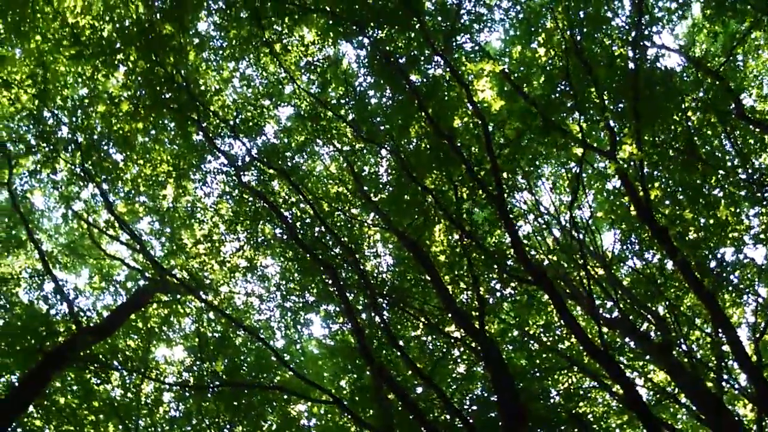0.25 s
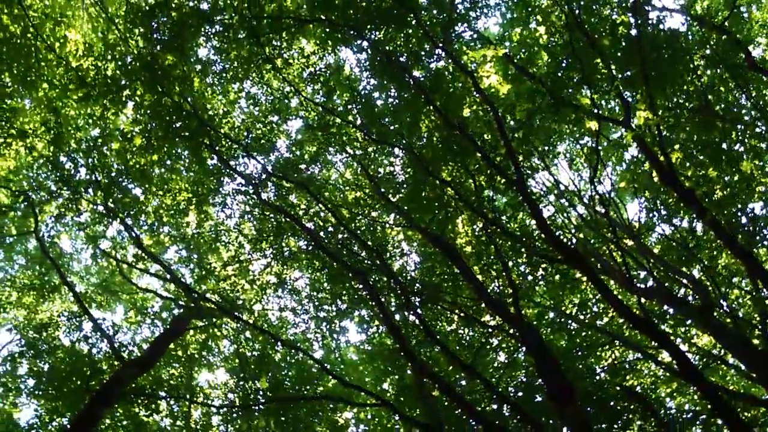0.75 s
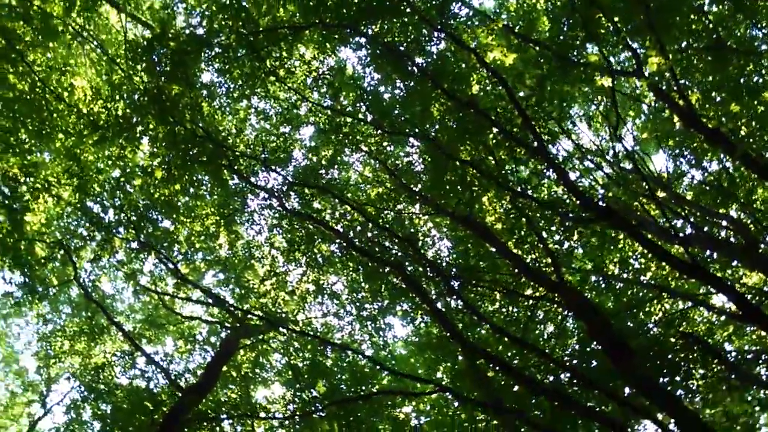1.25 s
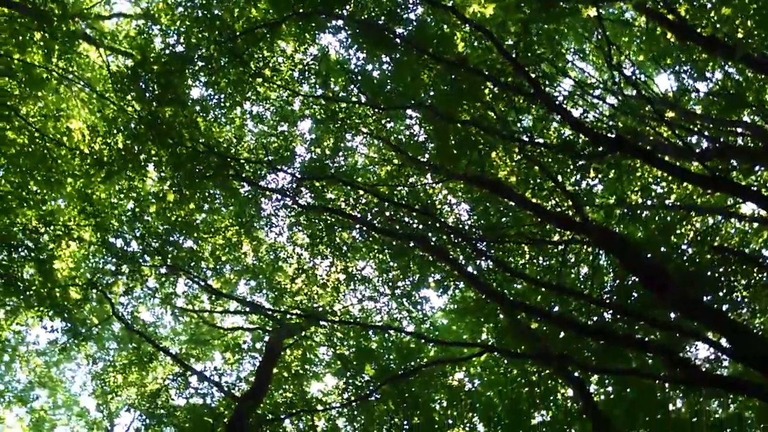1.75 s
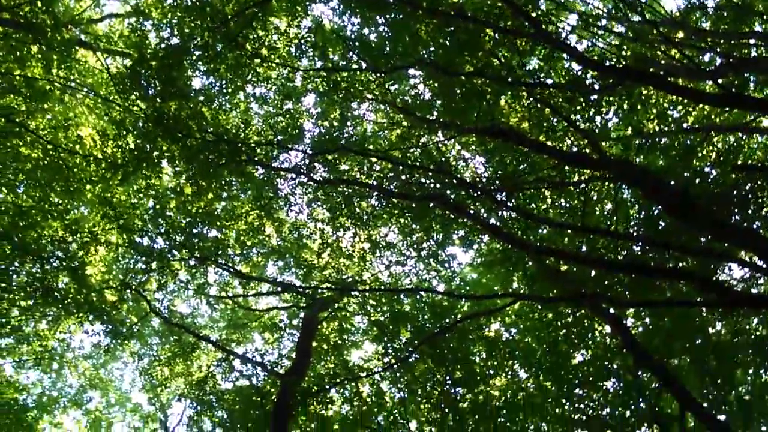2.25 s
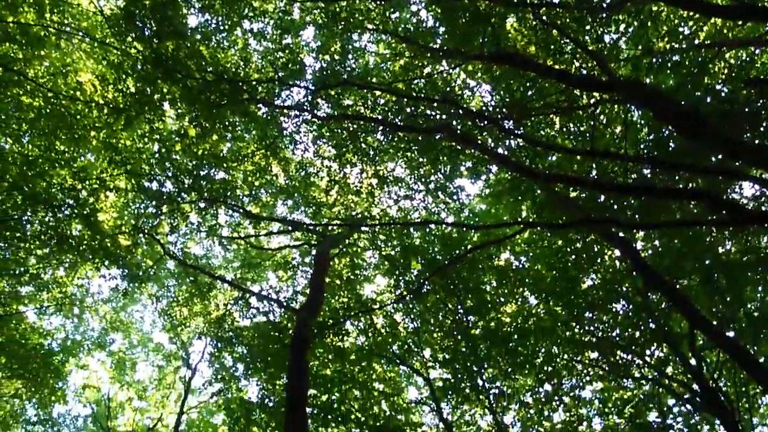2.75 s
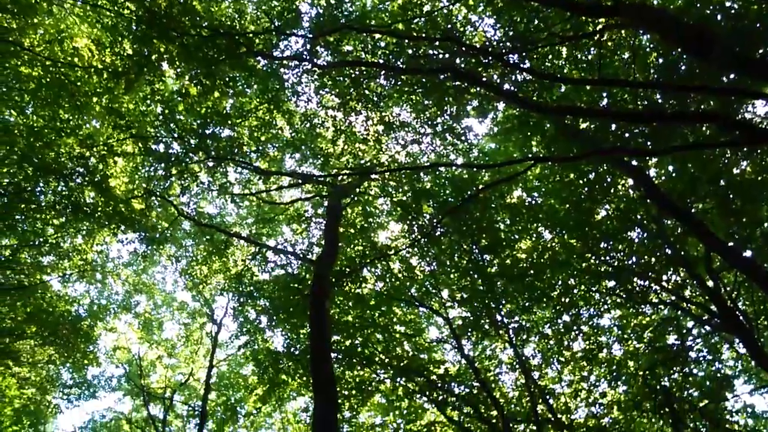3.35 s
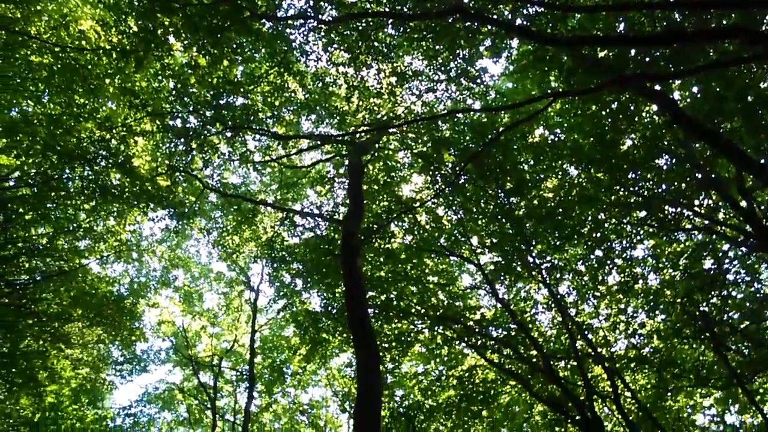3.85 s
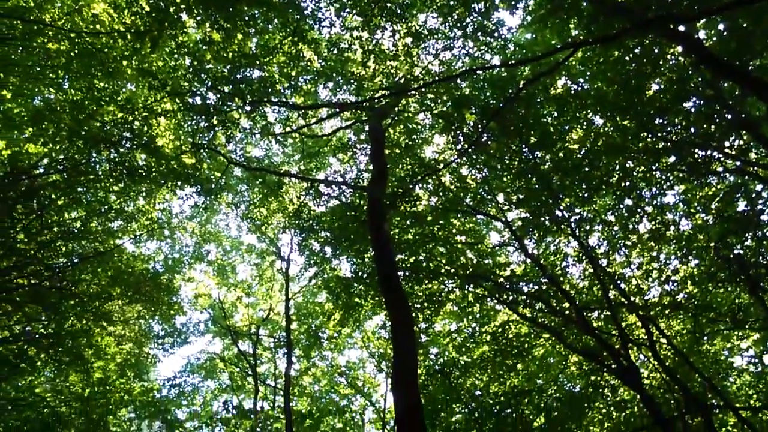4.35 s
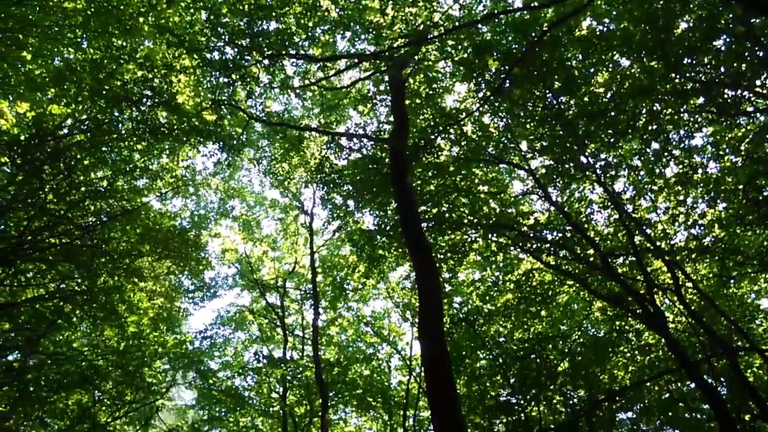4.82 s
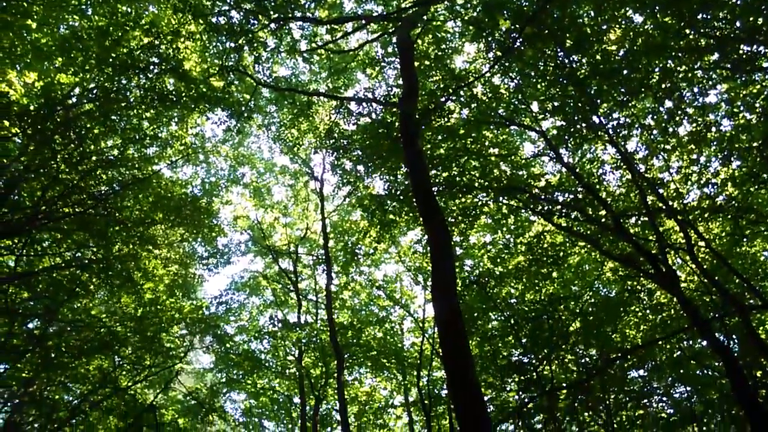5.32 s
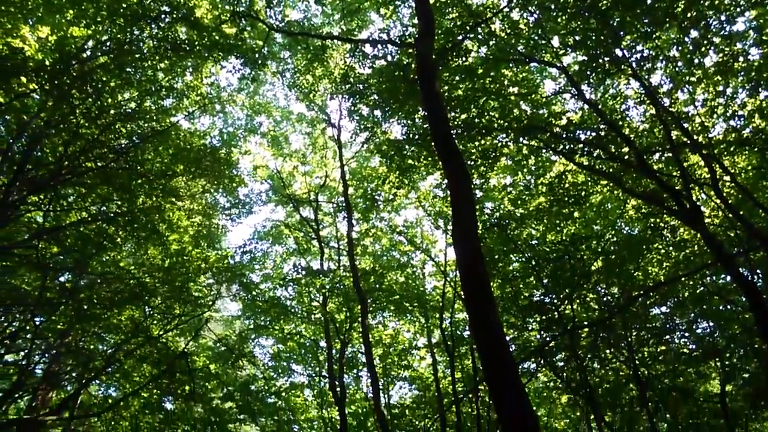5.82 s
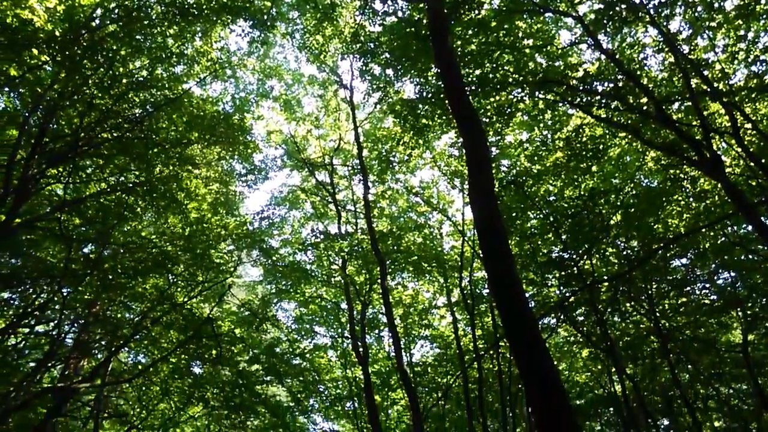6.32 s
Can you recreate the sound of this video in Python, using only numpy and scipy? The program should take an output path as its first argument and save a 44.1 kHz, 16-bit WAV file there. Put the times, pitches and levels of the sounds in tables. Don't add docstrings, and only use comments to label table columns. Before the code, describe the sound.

A thrush whistles bright, varied phrases and harsh chacks in a leafy wood, while wind buffets and thumps the microphone, strongest at the start.

```python
import sys
import numpy as np
from scipy import signal
from scipy.fft import rfft, irfft, next_fast_len
from scipy.io import wavfile
from scipy.ndimage import uniform_filter1d

SR = 44100
rng = np.random.default_rng(int(sys.argv[2]) if len(sys.argv) > 2 else 0)


def invert_db(x):
    u = np.asarray(x, float) / 20
    return 10 ** u


def int16_out(signal):
    q = np.round(np.clip(np.atleast_2d(signal).T, -1, 1) * 32767)
    wavfile.write(sys.argv[1], SR, q.astype(np.int16))


N = 290178


def at_hz(points, hz):
    table_hz, table_db = np.transpose(points)
    return np.interp(np.log(hz), np.log(table_hz), table_db)


def in_time(rows):
    s, *columns = np.transpose(rows)
    return [np.interp(np.arange(N) / SR, s, c) for c in columns]


def rms_one(x):
    return x / np.sqrt(np.mean(x ** 2) + 1e-20)


def filtered(x, order, hz, kind="low", zero_phase=False):
    run = signal.sosfiltfilt if zero_phase else signal.sosfilt
    return run(signal.butter(order, hz, kind, fs=SR, output="sos"), x)


def drift(rate_hz):
    r = np.exp(-2 * np.pi * rate_hz / SR)
    wander = signal.lfilter([1], [1, -2 * r, r * r], rng.standard_normal(N + SR))
    return rms_one(wander[SR:])


def coloured(points, channels):
    hz = np.maximum(np.arange(N // 2 + 1) * SR / N, 1)
    spectrum = rfft(rng.standard_normal((channels, N)))
    return rms_one(irfft(spectrum * invert_db(at_hz(points, hz)), N))


def panned(x, pan_db, lag=0):
    return np.stack([np.roll(x, lag) * invert_db(pan_db / 2), x * invert_db(-pan_db / 2)])


def glide(rows, start_db=0, end_db=0):
    return [[(s, a, db + start_db), (s + length, b, db + end_db)] for s, length, a, b, db in rows]


def scoop(rows):
    approach_s, onset_db, sag_db_per_s = 0.015, -6.5, 35
    notes = []
    for s, length, a, b, db in rows:
        t = np.linspace(0, length, num=24)
        left = np.exp(-t / approach_s)
        level_db = db + onset_db * left - sag_db_per_s * t
        notes.append(list(zip(s + t, b + (a - b) * left, level_db)))
    return notes


def whistle(note, overtones_db, waver, edge_s):
    # frequency in Hz, lift in dB.
    beak = [(4000, -0.5), (7000, -11.5), (9500, -10.5), (11500, 7.5), (15000, -7.5)]
    s, hz, level_db = np.transpose(sorted(note))
    start = max(round(s[0] * SR), 0)
    t = np.arange(start, min(round(s[-1] * SR), N)) / SR
    pitch = np.interp(t, s, hz)
    phase = 2 * np.pi * np.cumsum(pitch * (1 + waver[start:start + len(t)])) / SR
    tone = np.sin(phase)
    for k, db in enumerate(overtones_db, 2):
        audible = k * pitch < .45 * SR
        tone += invert_db(db + at_hz(beak, k * pitch)) * np.sin(k * phase) * audible
    to_edge = np.minimum(t - s[0], s[-1] - t)
    edges = np.sin(np.pi / 2 * np.clip(to_edge / edge_s, 0, 1)) ** 2
    out = np.zeros(N)
    out[start:start + len(t)] = np.sqrt(2) * tone * edges * invert_db(np.interp(t, s, level_db))
    return out


def wood(x, onset_s, early_db, top_early_db):
    top_hz, low_t60_s, top_t60_s = 8000, 0.7, 0.43
    early_t60_s = 0.076
    t = np.arange(SR) / SR
    noise = rng.standard_normal((2, SR)) * (1 - np.exp(-t / onset_s))
    low = filtered(noise, 2, top_hz)
    early = -60 * t / early_t60_s
    low_decay = invert_db(-60 * t / low_t60_s) + invert_db(early_db + early)
    top_decay = invert_db(-60 * t / top_t60_s) + invert_db(top_early_db + early)
    echoes = rms_one(low * low_decay + (noise - low) * top_decay) / np.sqrt(SR)
    size = next_fast_len(N + SR)
    return irfft(rfft(x, size) * rfft(echoes, size), size)[:, :N]


def air():
    # frequency in Hz, level in dB.
    spectrum = [(120, -15), (200, -10), (878, -15), (1090, -20.5), (4540, -25.5), (8920, -22), (13100, -25),
                (15700, -30)]
    # time in seconds, level in dB.
    hiss = [(0.0, -64), (0.4, -65.5), (1.1, -71.5), (1.87, -77), (1.97, -64), (2.7, -75.5), (2.82, -63.5),
            (3.4, -69.5), (3.57, -65.5), (3.7, -70.5), (3.75, -64), (4.15, -73), (4.38, -69), (4.42, -70),
            (5.03, -63), (5.07, -56.5), (5.9, -75.5), (6.58, -67)]
    noise, hiss_db = coloured(spectrum, channels=3), in_time(hiss)[0]
    top = filtered(noise, 2, 4500, "high", zero_phase=True)
    low = noise - top
    murmur_db = -53.5 + 0.013 * (hiss_db - np.mean(hiss_db))
    murmur = (0.79 * low[:2] + 0.42 * low[2]) * invert_db(murmur_db)
    flicker_db = .6 * drift(8)
    side_db = [[-3.5], [2.5]]
    return murmur + rms_one(top[:2]) * invert_db(hiss_db + 12.5 + flicker_db + side_db)


def gusting(gusts):
    rise_db_per_s, fall_db_per_s, lull_db = 1477.5, 519, (-45.5, -62.5)
    t, level = np.arange(N) / SR, np.outer(lull_db, np.ones(N))
    for s, length, *peak_db in gusts:
        loss = rise_db_per_s * np.maximum(s - t, 0) + fall_db_per_s * np.maximum(t - s - length, 0)
        level = np.maximum(level, np.array(peak_db)[:, None] - loss)
    return level


def wind():
    # frequency in Hz, density in dB per Hz.
    buffet = [(20, -44.5), (43, 10.5), (66, 7), (132, -7.5), (255, -26.5), (392, -40.5), (850, -35),
              (1540, -120)]
    # start in seconds, length in seconds, deep swell in dB, flutter in dB.
    left_gusts = [(.02, 0.11, -19.5, -36), (.22, 0.1, -32.5, -60), (.413, 0.42, -24.5, -45),
                  (.685, 0.017, -22, -26), (.732, 0.037, -14.5, -46), (.78, 0.092, -23.5, -45),
                  (.93, 0.17, -23.5, -61), (1.08, 0.074, -36.5, -60), (1.3, 0.18, -39, -52.5),
                  (1.5, 0.014, -25.5, -63), (1.83, 0.29, -40.5, -46), (2.22, 0.12, -30.5, -63),
                  (2.42, 0.08, -28.5, -43.5), (2.55, 0.33, -36.5, -41), (2.97, 0.061, -41, -42),
                  (3.12, 0.042, -35.5, -38.5), (3.21, 0.09, -33.5, -36.5), (3.43, 0.031, -35.5, -39.5),
                  (3.71, 0.036, -37, -38), (3.8, 0.17, -32, -30.5), (4.03, 0.076, -33.5, -32),
                  (4.19, 0.2, -34.5, -34), (4.56, 0.18, -36.5, -37.5), (4.81, 0.1, -37, -37),
                  (4.95, 0.2, -35, -55), (5.4, 0.19, -34.5, -41), (5.62, 0.16, -39, -40.5),
                  (6.15, 0.42, -37.5, -50)]
    right_gusts = [(0, 0.38, -32, -65), (.43, 0.23, -24, -50), (.73, 0.16, -32, -46), (.92, 0.19, -41, -47),
                   (2.32, 0.21, -35, -64), (2.6, 0.94, -55, -54), (3.7, 0.4, -60, -47),
                   (4.15, 0.25, -51, -47), (5.0, 0.28, -36, -54), (5.75, 0.11, -43, -64),
                   (6.2, 0.14, -42, -50.5)]
    deep_db, flutter_db = np.stack([gusting(left_gusts), gusting(right_gusts)], axis=1)
    eddies = coloured(buffet, channels=2)
    deep = filtered(eddies, 2, 140, zero_phase=True)
    lumps = np.clip([drift(69), drift(55)], -2, 2)
    swell = 3.35 * np.tanh(rms_one(deep * invert_db(2.02 * lumps)) / 2.32) * invert_db(deep_db)
    shedding_per_s = 56 * (1 + .1 * lumps[::-1])
    shed = np.cumsum(shedding_per_s, axis=1) / SR
    throb_db = 7 * np.sin(2 * np.pi * shed + .6)
    pushes = filtered(np.diff(np.floor(shed), prepend=0), 2, [90, 260], "band")
    bright = filtered(rms_one(eddies - deep) + invert_db(3) * rms_one(pushes), 1, 160, "high")
    edged = filtered(bright, 6, 285) + invert_db(-15.5) * bright
    flutter = rms_one(edged * invert_db(2.5 * lumps)) * invert_db(flutter_db + throb_db - 4.5)
    return filtered(swell + flutter, 3, 46, "high")


def slaps():
    # start in seconds, peak in dB, ring in Hz.
    eddy_slaps = [
        (0.028, -10, 111),
        (.1, -12, 102),
        (.413, -14.5, 110),
        (0.431, -12, 88),
        (0.564, -32, 92),
        (.604, -12, 93),
        (.692, -16.5, 218),
        (0.741, -6.5, 115),
        (.826, -22, 138),
        (1.378, -26.5, 151),
    ]
    cycles, pan_db = 3.3, 35
    out, t = np.zeros((2, N)), np.arange(6000) / SR
    for s, peak_db, hz in eddy_slaps:
        decay_db = -60 * t * hz / (2 * cycles)
        swing = -np.sin(2 * np.pi * hz * t) * invert_db(peak_db + 3.0 + decay_db)
        at = round(s * SR)
        out[:, at:at + 6000] += swing * invert_db([[0], [-pan_db]])
    return filtered(out, 4, [40, 380], "band")


def ticks():
    # start in seconds, peak in dB, ring in Hz.
    creaks = [(0.377, -38.5, 640), (0.412, -36, 676), (0.433, -39, 710), (0.464, -34, 910),
              (0.469, -30.5, 700), (0.485, -43, 1130), (0.737, -39.5, 680), (1.611, -40.5, 450),
              (3.351, -43.5, 1550), (3.659, -23, 1207), (3.698, -34.5, 1260), (4.01, -39.5, 823),
              (4.028, -43.5, 780), (5.468, -52, 400)]
    out, t = np.zeros((2, N)), np.arange(1500) / SR
    for s, peak_db, hz in creaks:
        ring = np.sin(2 * np.pi * hz * t) * invert_db(-60 * t / 0.021)
        shell = .5 * np.sin(2 * np.pi * 570 * t) * invert_db(-60 * t / 0.037)
        snap = invert_db(1.5 - 60 * t / 0.013) * rng.standard_normal(1500)
        at = round(s * SR)
        out[:, at:at + 1500] += panned(invert_db(peak_db) * (ring + shell + snap), pan_db=8.0)
    return filtered(out, 4, 1750)


def grip_hum(grip):
    return invert_db(-12) * wood(grip[0], onset_s=0.0074, early_db=10.5, top_early_db=1.5)


def far_coo():
    # time in seconds, pitch in Hz, level in dB.
    arch = [
        (3.81, 1250, -67),
        (3.95, 1444, -63),
        (4.05, 1540, -72),
    ]
    return whistle(arch, (), 0.03 * drift(60), edge_s=0.04) * invert_db(5 * drift(12))


def far_caller():
    # time in seconds, pitch in Hz, level in dB.
    nasal = [
        [(6.32, 1550, -57), (6.326, 1700, -48), (6.332, 2330, -47), (6.344, 2390, -45), (6.349, 1800, -44),
         (6.356, 1200, -56)],
    ]
    call = sum(whistle(note, (9, -1), .015 * drift(200), edge_s=.002) for note in nasal)
    effort = np.sqrt(uniform_filter1d(call ** 2, size=300) + 1e-12)
    rasp = filtered(rng.standard_normal(N), 6, [1800, 4900], "band")
    call = call + invert_db(-7) * effort * rms_one(rasp)
    haze = wood(call, onset_s=0.015, early_db=2, top_early_db=2)
    return invert_db(-3) * panned(call, 3.0) + invert_db(1.5) * haze


def small_birds():
    # start in seconds, length in seconds, from Hz, to Hz, level in dB.
    lisp_notes = [(.2, 0.081, 8200, 8340, -52), (.255, 0.061, 9200, 9000, -48),
                  (.262, 0.052, 7230, 7870, -48.5), (.35, 0.081, 9250, 8730, -50.5),
                  (.36, 0.036, 7000, 7890, -44), (.4, .09, 7550, 7600, -66), (1.9, 0.083, 9230, 9800, -49),
                  (1.93, 0.12, 8530, 7940, -56), (1.972, 0.0077, 8000, 6860, -38),
                  (1.98, 0.0048, 6830, 7120, -36), (2.02, 0.017, 8160, 8550, -56),
                  (2.06, 0.051, 8760, 8430, -56), (2.08, 0.1, 7300, 7370, -58),
                  (3.1, 0.043, 6400, 7430, -53.5), (3.13, 0.044, 7700, 6500, -58),
                  (3.2, 0.043, 8500, 8400, -55.5), (3.235, 0.091, 7750, 7800, -56.5),
                  (3.21, 0.08, 6700, 6900, -50), (4.97, 0.088, 6890, 8260, -51.5),
                  (5.405, 0.065, 7650, 7520, -46.5), (5.51, 0.055, 7100, 7700, -45),
                  (5.55, 0.09, 8700, 8000, -53.5), (6.47, 0.047, 8000, 8120, -56),
                  (6.5, 0.034, 7500, 7630, -56.5)]
    tsip_notes = [
        (4.768, 0.0097, 8650, 7900, -39),
        (4.77, 0.012, 7500, 6360, -40.5),
        (4.828, 0.053, 8900, 7300, -48),
        (4.828, 0.016, 7650, 6330, -37.5),
        (4.878, 0.014, 8700, 7400, -35.5),
        (4.88, 0.012, 7530, 6460, -37.5),
        (5.62, 0.036, 6640, 7380, -46),
        (6.0, 0.027, 6940, 6270, -54),
        (6.2, 0.011, 3570, 3860, -57.5),
    ]
    waver = .02 * drift(250)
    lisps = sum(whistle(note, (), waver, edge_s=.004) for note in glide(lisp_notes))
    tsips = sum(whistle(note, (), 0 * waver, edge_s=.004) for note in glide(tsip_notes))
    return panned(lisps, -16.5) + panned(tsips, 1.5)


def chacks():
    # start in seconds, length in seconds, centre in Hz, width in Hz, level in dB.
    rasps = [
        (0, 0.083, 2620, 494, -54),
        (0, 0.0044, 4620, 1360, -18.5),
        (0, 0.091, 6240, 1600, -48),
        (0.2, 0.042, 4180, 1510, -33),
        (0.794, 0.015, 5080, 2185, -32),
        (0.1, 0.028, 4740, 700, -24),
        (0.159, 0.09, 3040, 1200, -49),
        (0.307, 0.15, 2020, 1410, -61.5),
    ]
    harsh = [
        (0.437, 0.033, 4920, 1570, -32),
        (0.727, 0.06, 5200, 2020, -39.5),
        (1.135, 0.12, 5600, 1560, -57.5),
        (2.215, 0.053, 5280, 2310, -31.5),
        (2.762, 0.053, 7250, 910, -44),
        (2.796, 0.029, 7200, 2400, -30.5),
        (3.511, 0.03, 5460, 1290, -39),
        (4.392, 0.025, 5140, 1120, -27),
        (5.062, 0.03, 5100, 2240, -35.5),
    ]
    t = np.arange(4000) / SR
    out = np.zeros(N)
    for bursts, spray_gain in ((rasps, 0), (harsh, invert_db(-5.5))):
        for s, length, hz, width_hz, level_db in bursts:
            noise = rng.standard_normal((2, 4000))
            body = filtered(noise[0], 4, [hz - width_hz / 2, hz + width_hz / 2], "band")
            spray = filtered(noise[1], 1, [5000, 14000], "band")
            swell = np.sin(np.pi * np.clip(t / length, 0, 1)) ** .8
            at = round(s * SR)
            out[at:at + 4000] += invert_db(level_db) * (rms_one(body) + spray_gain * spray) * swell
    return out


def thrush():
    # time in seconds, share of the pitch.
    burr = [(.85, .022), (.87, .005), (1.6, .035), (2.3, .03), (2.35, .002), (2.74, .002), (2.76, .025),
            (2.83, .025), (2.9, .003), (5.02, .004), (5.06, .012), (5.19, .022), (5.35, .005), (6.3, .025)]
    # time in seconds, lift in dB.
    strain = [(0, -13.5), (3.6, 7), (3.7, 13.5), (3.8, 6.5), (4.1, -0.5), (4.9, 3), (5.04, 1.5),
              (5.27, 7.5), (5.35, 5), (6.58, -6.5)]
    # start in seconds, length in seconds, from Hz, to (or held) Hz, level in dB.
    held = [(.065, 0.036, 3990, 4940, -18.5), (.922, 0.035, 3380, 3862, -21),
            (3.281, 0.13, 2368, 3060, -25.5), (3.35, 0.095, 3012, 3433, -16),
            (3.555, 0.032, 3705, 2533, -21), (3.717, 0.049, 6710, 4860, -22.5),
            (3.852, 0.16, 2360, 2972, -20), (4.158, 0.11, 3880, 3472, -13.5),
            (4.797, 0.087, 3077, 3182, -15), (4.882, 0.074, 3946, 3535, -15.5),
            (4.579, 0.026, 5010, 4026, -13.5), (4.416, 0.043, 3320, 3106, -15),
            (5.04, 0.071, 7380, 6565, -24)]
    struck = [(0, 0.0098, 4220, 3680, -11), (.306, 0.014, 4200, 3120, -18), (.322, 0.036, 3274, 3980, -26),
              (.555, 0.011, 4230, 3230, -17), (.565, 0.035, 3240, 3780, -25.5),
              (.59, 0.048, 3467, 4295, -27), (.91, 0.014, 3160, 2560, -31.5),
              (1.73, 0.034, 2705, 3290, -33), (2.121, 0.013, 3110, 2640, -29),
              (2.64, 0.026, 2440, 2154, -31.5), (2.94, 0.017, 4600, 4340, -31.5),
              (2.956, 0.019, 2695, 2216, -26.5), (3.012, 0.051, 2980, 2720, -24),
              (4.083, 0.011, 2550, 2340, -22.5), (4.463, 0.022, 3383, 3654, -13.5),
              (4.478, 0.016, 3626, 3410, -13), (4.562, 0.017, 2874, 2900, -26),
              (4.708, 0.038, 4023, 4000, -23), (5.048, 0.035, 11670, 11200, -38),
              (5.06, 0.025, 9040, 9300, -47), (5.228, 0.052, 4120, 3880, -23)]
    slurs = [(.205, 0.022, 5120, 4320, -41), (.293, 0.02, 3880, 4070, -36), (.35, 0.024, 4430, 3660, -30),
             (.45, 0.027, 4630, 4320, -31), (.733, 0.0066, 6340, 4900, -27),
             (.878, 0.035, 3540, 3180, -27.5), (1.72, 0.016, 3640, 2670, -40),
             (2.136, 0.051, 2750, 3174, -35), (2.43, 0.17, 2204, 1995, -41.5),
             (2.665, 0.024, 2126, 1430, -48.5), (2.949, 0.0091, 4370, 2430, -25.5),
             (3.527, 0.024, 4447, 2470, -19), (3.6, 0.029, 3000, 2090, -37.5),
             (3.758, 0.033, 4910, 5410, -18), (4.025, .055, 2460, 2670, -25),
             (4.668, 0.013, 3496, 3534, -11), (4.693, 0.02, 3568, 4080, -14.5),
             (5.391, 0.0072, 3540, 2890, -14.5), (5.413, 0.047, 2910, 4105, -18.5),
             (5.462, 0.0079, 3150, 2230, -33)]
    swelling = [(.535, 0.021, 4403, 3930, -14.5), (.71, 0.018, 5380, 4420, -26.5),
                (.8, 0.0081, 5150, 4760, -15.5), (1.698, 0.019, 1980, 2470, -42.5),
                (2.09, 0.017, 1810, 2220, -48), (2.4, 0.031, 2030, 2140, -44),
                (3.707, 0.029, 6000, 6560, -21), (5.15, .03, 6300, 5700, -27),
                (4.498, 0.029, 3480, 2928, -12), (5.172, 0.068, 5750, 4043, -10),
                (5.36, 0.027, 3680, 3664, -13)]
    dives = [
        (2.779, 0.021, 9400, 6900, -37),
        (2.796, 0.013, 7300, 5500, -28),
        (2.806, .013, 5800, 3800, -35),
        (2.761, .02, 6500, 7300, -43),
        (2.765, .02, 9300, 9600, -48),
        (2.22, .025, 5900, 5100, -36),
        (4.388, .014, 4200, 5700, -36),
        (4.4, .02, 5700, 5200, -29),
        (3.505, .018, 4200, 7000, -41),
        (5.058, .014, 4000, 6200, -38),
    ]
    waver = in_time(burr)[0] * drift(200)
    notes = scoop(held) + glide(struck, end_db=-5) + glide(slurs) + glide(dives)
    notes = notes + glide(swelling, start_db=-17)
    overtones_db = (-29, -33, -43)
    clean = sum(whistle(note, overtones_db, waver, edge_s=0.0048) for note in notes)
    effort = np.sqrt(uniform_filter1d(clean ** 2, size=400) + 1e-12)
    breath = filtered(rng.standard_normal(N), 4, 9500, "high")
    top = filtered(clean, 4, 8800, "high", zero_phase=True)
    return clean + (invert_db(in_time(strain)[0]) - 1) * top + invert_db(-32.0) * effort * breath


def scene():
    singer, small = thrush() + chacks(), small_birds()
    top = filtered(singer, 3, 7140, "high", zero_phase=True)
    direct = invert_db(-2) * panned(singer - 0.36 * top, -7, lag=-6) + invert_db(-5) * small
    heard_all_round = invert_db(-3) * singer + far_coo() + invert_db(-3) * (small + .3 * small[::-1])
    haze = wood(heard_all_round, onset_s=0.015, early_db=17, top_early_db=-3.5)
    grip = ticks()
    return direct + haze + wind() + slaps() + grip + grip_hum(grip) + air() + far_caller()


def low_pass(x):
    return signal.sosfilt(signal.butter(12, 15860, fs=SR, output="sos"), x)


def record(dry):
    return low_pass(dry)


dry = scene()
out = record(dry)
int16_out(out)
```